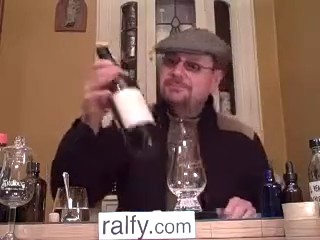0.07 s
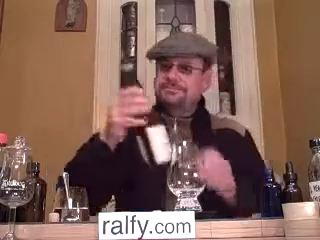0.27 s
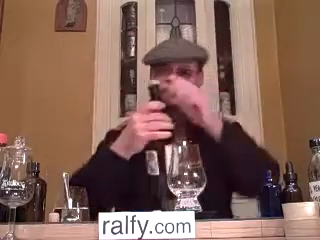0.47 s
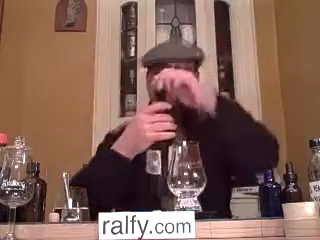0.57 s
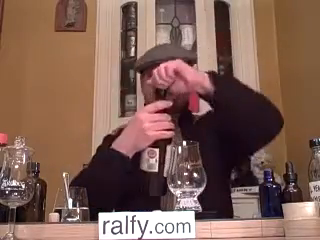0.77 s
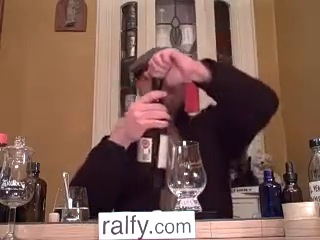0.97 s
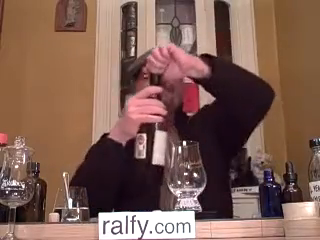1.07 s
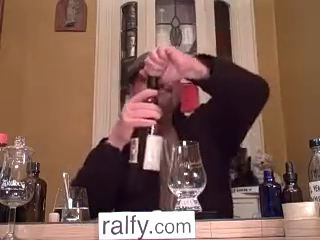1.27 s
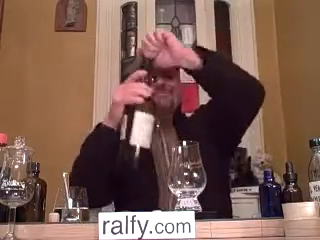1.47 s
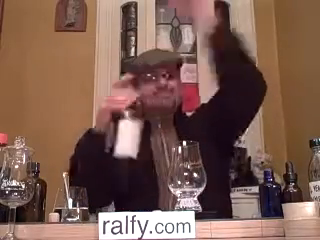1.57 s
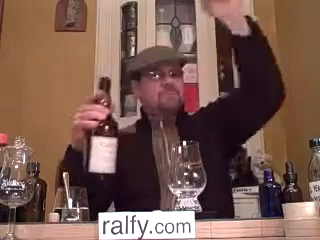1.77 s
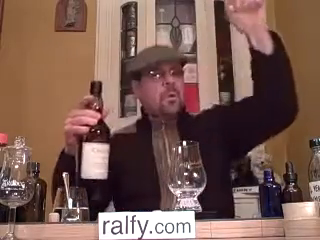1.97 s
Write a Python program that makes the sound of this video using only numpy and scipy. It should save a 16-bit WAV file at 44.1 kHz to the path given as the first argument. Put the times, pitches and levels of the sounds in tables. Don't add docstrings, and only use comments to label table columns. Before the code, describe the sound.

A cork pops sharply out of a glass bottle after faint finger thuds on the glass; the hollow neck rings briefly, then two small knocks land on the table, in a small room with low camera hiss.

```python
import sys
import numpy as np
from scipy import signal
from scipy.fft import rfft, irfft, next_fast_len
from scipy.io import wavfile
from scipy.ndimage import uniform_filter1d, map_coordinates

SR = 44100
rng = np.random.default_rng(int(sys.argv[2]) if len(sys.argv) > 2 else 0)


def boost_factor(decibels):
    exponent = np.asarray(decibels, float) / 20
    return 10 ** exponent


def unload_wav(signal):
    wavfile.write(
        sys.argv[1],
        SR,
        np.round(np.clip(np.atleast_2d(signal).T, -1, 1) * 32767).astype(np.int16),
    )


N = 89567


def unit(x):
    return x / np.sqrt(np.mean(x ** 2) + 1e-20)


def along(points, hz):
    f, v = np.transpose(points)
    return np.interp(np.log(hz + 1), np.log(f + 1), v)


def curves(rows):
    s, *cols = np.transpose(rows)
    t = np.arange(N) / SR
    return [np.interp(t, s, c) for c in cols] + [(t >= s[0]) & (t <= s[-1])]


def tone(hz):
    return np.sqrt(2) * np.sin(2 * np.pi * np.cumsum(hz) / SR)


def wobble(rate_hz):
    knots = rng.standard_normal(int(N * rate_hz / SR) + 4)
    return map_coordinates(knots, [np.arange(N) * rate_hz / SR])


def filtered(x, response):
    m = next_fast_len(N + SR // 2)
    return irfft(rfft(x, m) * response(np.fft.rfftfreq(m, 1 / SR)), m)[:N]


def noise(response):
    return unit(filtered(rng.standard_normal(N), response))


def impulse(s):
    return 1. * (np.arange(N) == round(s * SR))


def since(s):
    t = np.arange(N) / SR - s
    return np.maximum(t, 0), t >= 0


def rise(t, time_s):
    return 1 - np.exp(-t / time_s)


# [f/Hz, t60/s]
ROOM_DECAY = [(60, .12), (200, 0.46), (500, 0.55), (1500, 0.54), (4300, .38), (5500, .3), (8000, 0.29)]


def room(x, wet_db):
    delay_s, early_db, early_t60_s = .002, 3, 0.15
    hz, t, z = signal.stft(rng.standard_normal(SR // 2), SR, nperseg=256)
    early = 1 + boost_factor(early_db - 60 * t / early_t60_s)
    decay = boost_factor(-60 * t / along(ROOM_DECAY, hz)[:, None])
    tail = signal.istft(z * early * decay, SR, nperseg=256)[1]
    delayed = np.pad(x, (round(delay_s * SR), 0))
    late = signal.fftconvolve(delayed, tail / np.linalg.norm(tail))[:N]
    return x + boost_factor(wet_db) * late


# [t/s, f/Hz, level/dB, upper whistle level/dB]
SQUEAL_PATH = [(1.582, 3715, -64, -50), (1.585, 3667, -36.5, -40), (1.5862, 3676, -38, -42.5),
               (1.588, 3780, -17, -22), (1.5891, 4044, -21, -14.5), (1.5902, 4344, -14.5, -17.5),
               (1.5913, 4515, -7.5, -35), (1.5926, 4790, -23, -47.5), (1.5935, 5000, -49, -39)]


def squeal():
    spread_hz, whistle_hz, whistle_spread_hz, whistle_db = 170, 7710, 850, -2.5
    hz, low_db, high_db, on = curves(SQUEAL_PATH)
    low = boost_factor(low_db) * tone(hz + spread_hz * wobble(900))
    high = boost_factor(high_db) * tone(whistle_hz + whistle_spread_hz * wobble(1500))
    return room(on * low, wet_db=-3) + room(boost_factor(whistle_db) * on * high, wet_db=-1)


# [f/Hz, level/dB]
CRACK_SPECTRUM = [(60, -11.5), (300, -3), (950, 7), (1300, 1), (2300, -3.5), (3200, 3.5), (5600, -12.5),
                  (9500, -3.5)]


def seal_break():
    crack_s, crack_db, crack_t60_s = 1.587, -19, 0.018
    snap_s, snap_db = 1.589, -17

    def spectrum(f):
        return boost_factor(along(CRACK_SPECTRUM, f))
    t, _ = since(crack_s)
    crack = rise(t, 0.00083) * boost_factor(crack_db - 60 * t / crack_t60_s) * noise(spectrum)
    snap = boost_factor(snap_db) * filtered(impulse(snap_s), spectrum)
    return crack + room(snap, wet_db=11) - snap


OPEN_S = 1.593


def plop():
    from_hz, to_hz, glide_s, t60_s, level_db = 150, 560, .003, .018, -24
    t, after = since(OPEN_S)
    sweep_hz = to_hz - (to_hz - from_hz) * np.exp(-t / glide_s)
    envelope = after * boost_factor(level_db - 60 * t / t60_s) * rise(t, 0.0016)
    return room(envelope * tone(after * sweep_hz), wet_db=6.5)


# [t/s, f/Hz, level/dB]
NECK_RING = [(1.594, 677.3, -18.5), (1.601, 700, -19.5), (1.624, 707.2, -24), (1.635, 706, -36.5),
             (1.678, 716, -39), (1.70, 716, -32.5), (1.79, 715, -49.5), (1.84, 714, -48.5),
             (1.94, 716, -72.5)]


def neck_ring():
    rough_db = 1.2
    hz, db, on = curves(NECK_RING)
    t, _ = since(NECK_RING[0][0])
    return on * rise(t, 0.0018) * boost_factor(db + rough_db * wobble(60)) * tone(hz)


# [f/Hz, level/dB, t60/s]
BOOM_MODES = [(245, -22, 0.71), (275, -15.5, 0.32), (342.4, -19, 0.48), (422, -32, 0.3), (453, -19.5, 0.25),
              (638, -7, 0.28), (671.7, -4.5, 0.42)]


def boom():
    boom_db = -23
    t, _ = since(OPEN_S)
    modes = np.zeros(N)
    for hz, db, t60_s in BOOM_MODES:
        modes += boost_factor(boom_db + db - 60 * t / t60_s) * np.sin(2 * np.pi * hz * t)
    return rise(t, .006) * modes


# [t/s, peak level/dB, resonance f/Hz, room level/dB]
TABLE_KNOCKS = [
    (1.799, -53, 5700, 1),
    (1.817, -41, 1610, 6),
    (1.821, -39, 3700, 4.5),
    (1.9665, -37, 2070, 7.5),
    (1.9662, -32, 4040, 0),
    (1.9668, -36.5, 5800, 3.5),
    (1.975, -38, 2800, 4),
    (1.9946, -37.5, 1400, 1.5),
    (1.995, -44.5, 462, 6),
]


def knocks():
    resonance_q, broad_db = 2.36, -19
    out = np.zeros(N)
    for s, db, hz, wet_db in TABLE_KNOCKS:
        width_hz = hz / resonance_q

        def response(f):
            resonance = 1j * f * width_hz / (hz * hz - f * f + 1j * f * width_hz)
            click = 1j * f / (900 + 1j * f) / (1 + 1j * f / 4000)
            return resonance ** 2 + boost_factor(broad_db) * click
        hit = filtered(impulse(s), response)
        out += room(boost_factor(db) * hit / np.abs(hit).max(), wet_db)
    return out


# [t/s, f/Hz, level/dB, t60/s]
GLASS_RINGS = [
    (.665, 2420, -69.5, 0.12),
    (1.817, 940, -49, .08),
    (1.85, 992, -61.5, .6),
    (1.968, 704, -53.5, 0.18),
    (1.996, 1164, -49.5, 0.1),
]


def glass_rings():
    waver_hz = 4.2
    out = np.zeros(N)
    for s, hz, db, t60_s in GLASS_RINGS:
        t, _ = since(s)
        out += boost_factor(db - 60 * t / t60_s) * rise(t, 0.0013) * tone(hz + waver_hz * wobble(40))
    return out


def tap_noise():
    return noise(lambda f: (f > 120) / (1 + (f / 500) ** 1.72))


# [t/s, peak level/dB, f/Hz]
FINGER_THUDS = [(0.129, -53, 168), (0.146, -58, 154), (0.264, -54.5, 183), (0.369, -55, 150),
                (0.431, -62, 151), (0.6, -55, 114), (0.744, -55, 157), (0.76, -66, 122), (0.867, -58, 120),
                (1.039, -58, 264), (1.133, -55.5, 199), (1.196, -54.5, 238), (1.361, -56.5, 123),
                (1.439, -52, 154), (1.519, -70.5, 140), (1.899, -51, 122)]


def finger_thuds():
    cycles, thud_db, lag_s = 2.06, -0.5, .006
    click_db, click_t60_s = -4.5, 0.051
    out = np.zeros(N)
    tap = tap_noise()
    for s, db, hz in FINGER_THUDS:
        t, after = since(s + lag_s)
        click = boost_factor(click_db - 60 * t / click_t60_s) * after * tap
        envelope = t * hz * np.exp(1 - t * hz * 3 / cycles)
        out -= boost_factor(db + thud_db) * (envelope * np.sin(2 * np.pi * hz * t) + click)
    return out


# [f/Hz, level/dB]
SCUFF_SPECTRUM = [(600, -13), (1400, 3.5), (3500, 1.5), (7000, -20)]


def scuff():
    centre_s, half_s, level_db = 0.1935, 0.015, -61
    swell = np.exp(-((np.arange(N) / SR - centre_s) / half_s) ** 2)
    return boost_factor(level_db) * swell * noise(lambda f: boost_factor(along(SCUFF_SPECTRUM, f)))


def fading_knock():
    level_db, t60_s = -69, 0.86
    tail = unit(filtered(tap_noise(), lambda f: (f > 300) * (f < 1900) * f ** 0.56))
    return boost_factor(level_db - 60 * np.arange(N) / SR / t60_s) * tail


# [t/s, f/Hz, level/dB]
HUM_PATH = [(0.0, 36, -67), (0.12, 37, -87), (0.16, 37, -70), (0.22, 38.16, -72.5), (0.57, 38.6, -62),
            (1.51, 38.35, -65.5), (1.6, 37.3, -67.5), (1.66, 38.5, -79), (1.73, 38.2, -59),
            (1.78, 37.1, -86), (1.86, 32.9, -80.5), (2.03, 33.08, -74)]


def hum():
    hz, db, _ = curves(HUM_PATH)
    return boost_factor(db + 1.2 * wobble(14)) * tone(hz + 1.5 * wobble(5))


def scene():
    cork = squeal() + seal_break()
    neck = plop() + neck_ring() + boom()
    table = knocks() + glass_rings()
    handling = finger_thuds() + scuff() + fading_knock()
    return (cork + neck + table + handling + hum())[None]


# [f/Hz, level/dB]
MIC_RESPONSE = [(20, 5.5), (8300, 0.5), (8900, -12), (9500, -36), (11000, -53), (16000, -75)]


def microphone(x):
    return filtered(x, lambda f: boost_factor(along(MIC_RESPONSE, f)))


# [f/Hz, level/dB per Hz]
HISS_SPECTRUM = [(29, -30.5), (50, -7), (136, -17.5), (452, -19.5), (888, -26.5), (991, -26.5),
                 (5310, -33.5), (7040, -37.5), (9150, -50), (11900, -95.5), (20100, -120)]


def camera_noise():
    hiss_db, fizz_db = -65, -93.5
    hiss = noise(lambda f: boost_factor(along(HISS_SPECTRUM, f)) * (f > 45))
    fizz = noise(lambda f: (f > 9300) * (f < 15500) / (1 + (f / 11400) ** 40) ** .07)
    return boost_factor(hiss_db + 0.89 * wobble(4.5)) * hiss + boost_factor(fizz_db) * fizz


# [start t/s, end t/s]
TREBLE_HUSH = [
    (1.571, 1.582),
    (1.954, 1.964),
]


def hushed(x):
    corner_hz, hush_db = 1500, -24
    t = np.arange(N) / SR
    gate = uniform_filter1d(sum(1. * (t > a) * (t < b) for a, b in TREBLE_HUSH), size=60)
    treble = filtered(x, lambda f: 1 / (1 + (corner_hz / (f + 1)) ** 4) / (1 + (f / 9800) ** 30))
    return x - gate * (1 - boost_factor(hush_db)) * treble


# [f/Hz, level/dB]
CLOCK_WHINE = [(11025, -93)]


def clock_whine():
    hz, db = CLOCK_WHINE[0]
    return boost_factor(db + 1.5 * wobble(60)) * tone(np.full(N, hz))


def roll_off(x):
    return signal.sosfilt(signal.butter(12, 15500, fs=SR, output="sos"), x)


def record(dry):
    mix = hushed(microphone(dry[0]) + camera_noise()) + clock_whine()
    return roll_off(mix)


dry = scene()
out = record(dry)
unload_wav(out)
```